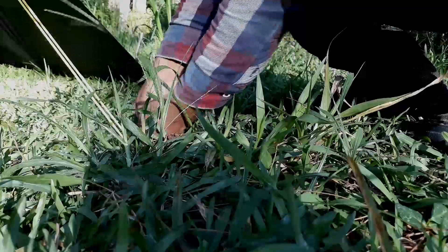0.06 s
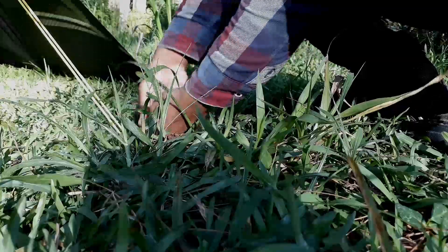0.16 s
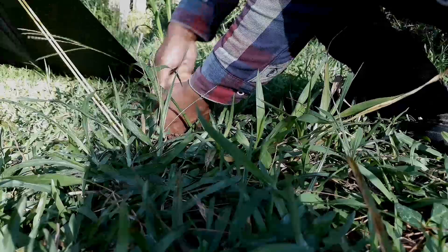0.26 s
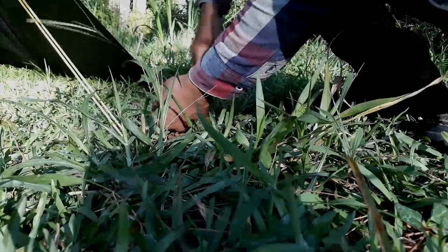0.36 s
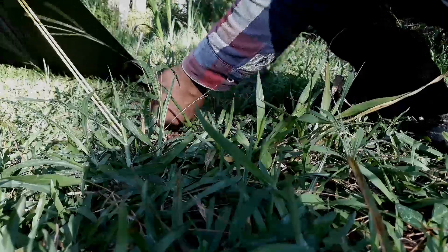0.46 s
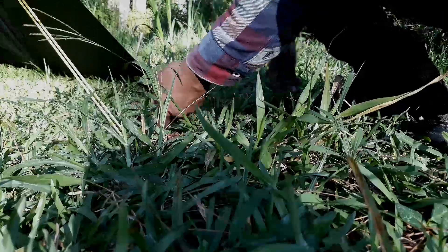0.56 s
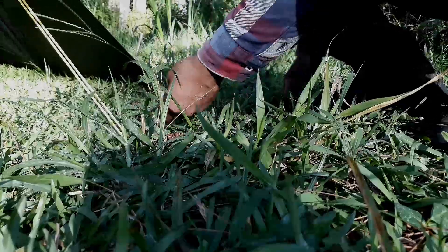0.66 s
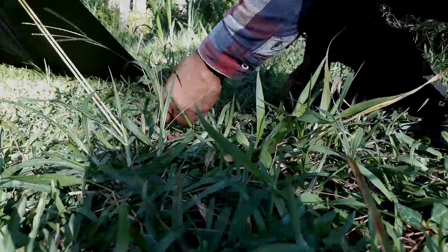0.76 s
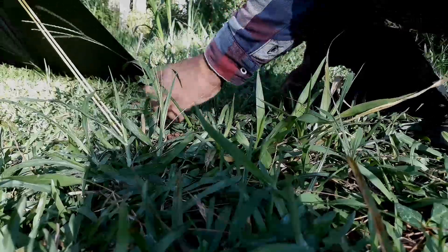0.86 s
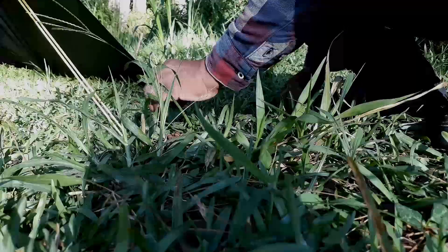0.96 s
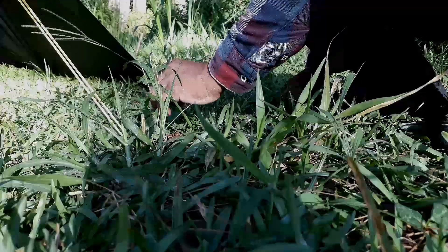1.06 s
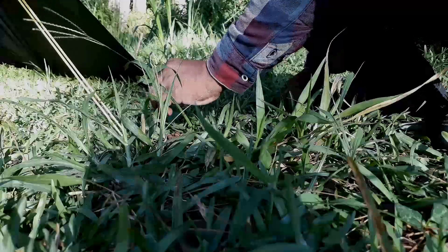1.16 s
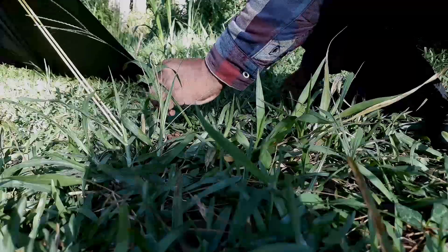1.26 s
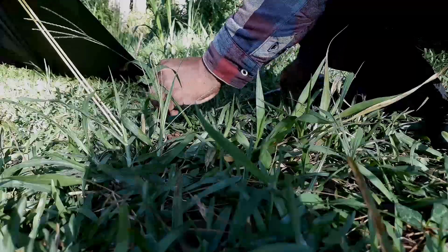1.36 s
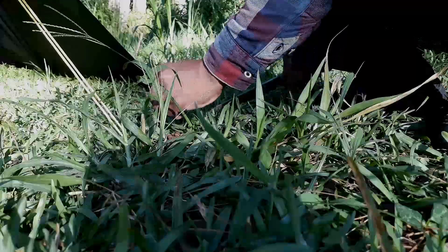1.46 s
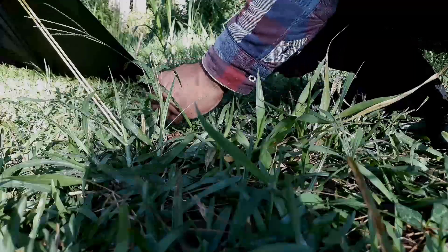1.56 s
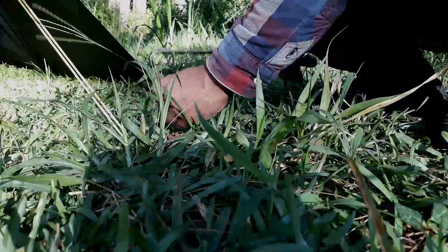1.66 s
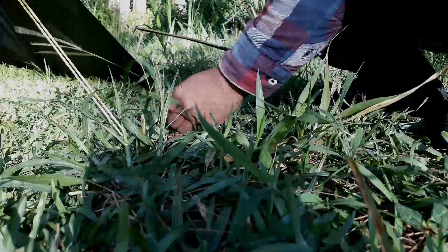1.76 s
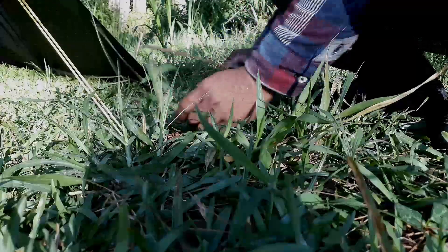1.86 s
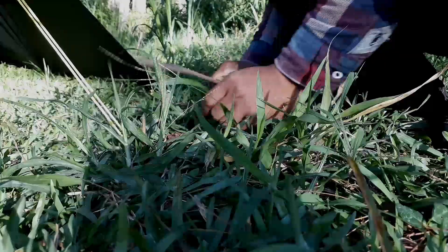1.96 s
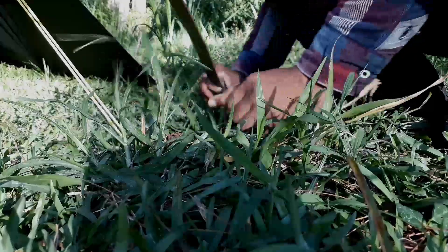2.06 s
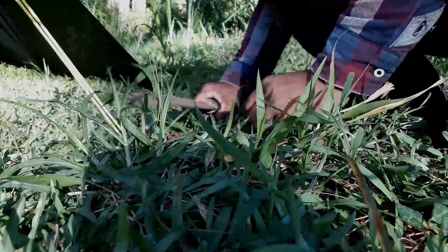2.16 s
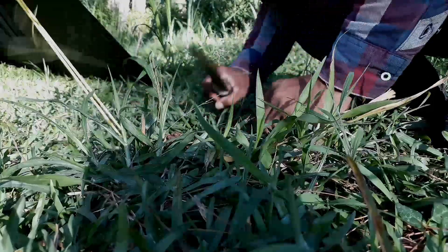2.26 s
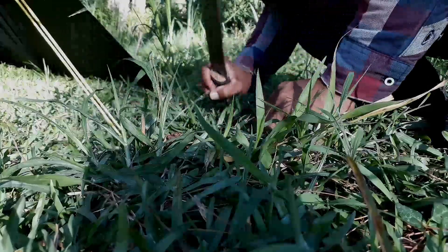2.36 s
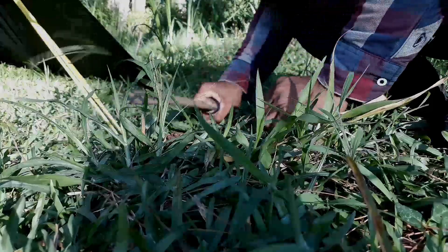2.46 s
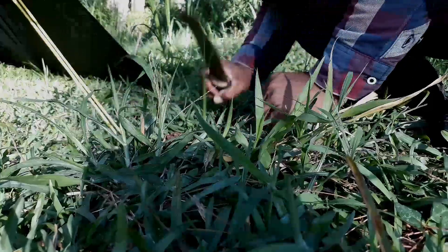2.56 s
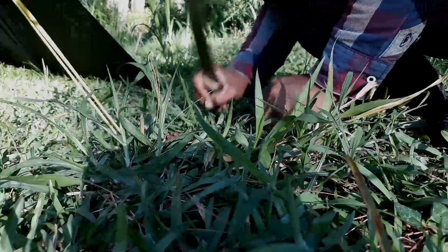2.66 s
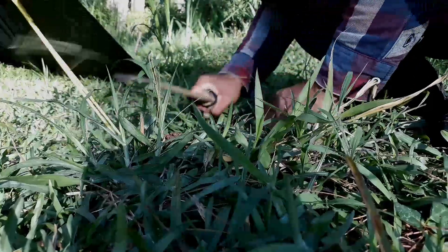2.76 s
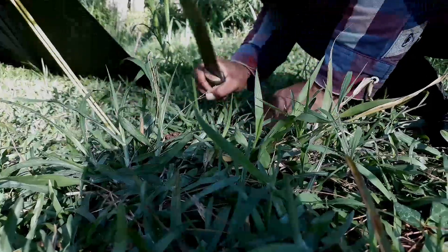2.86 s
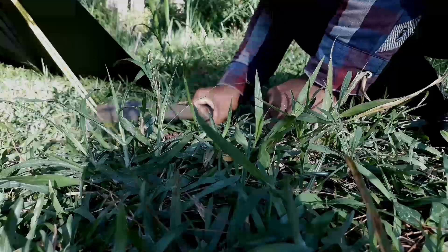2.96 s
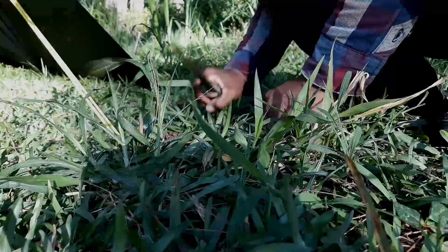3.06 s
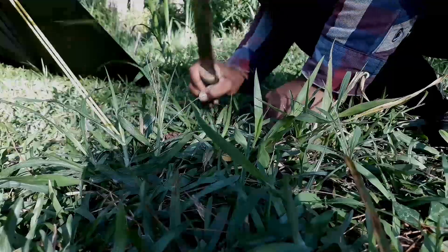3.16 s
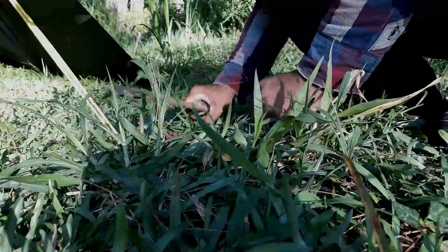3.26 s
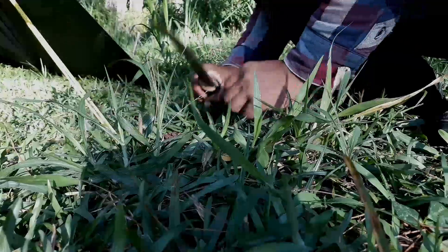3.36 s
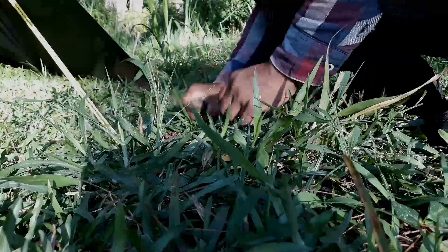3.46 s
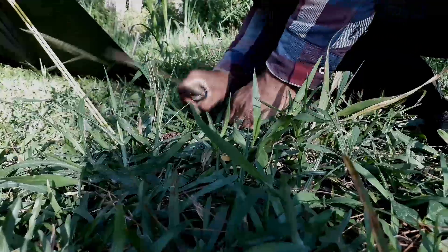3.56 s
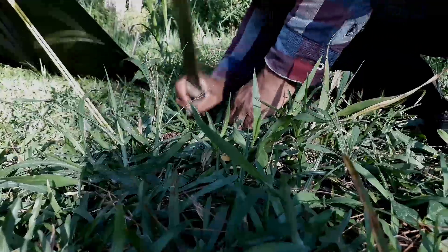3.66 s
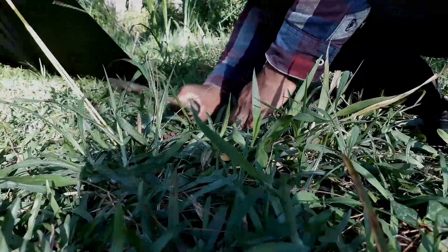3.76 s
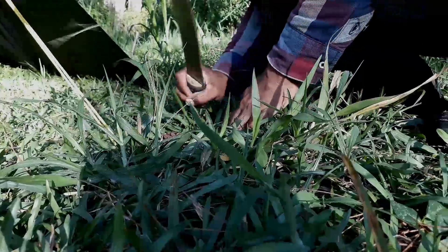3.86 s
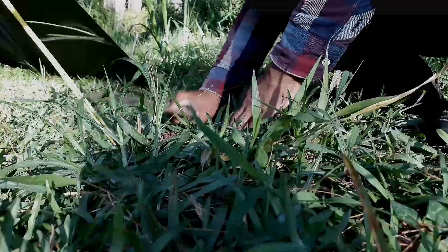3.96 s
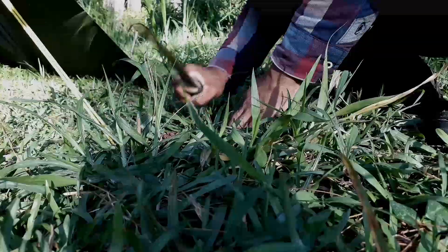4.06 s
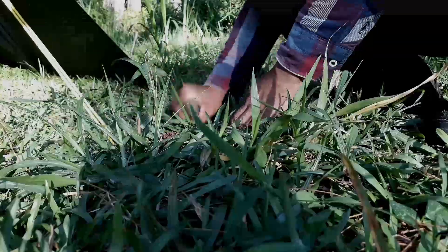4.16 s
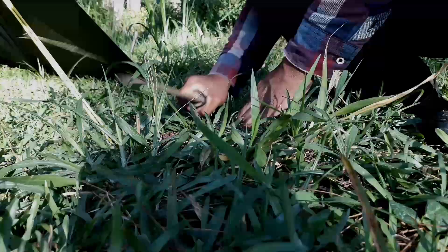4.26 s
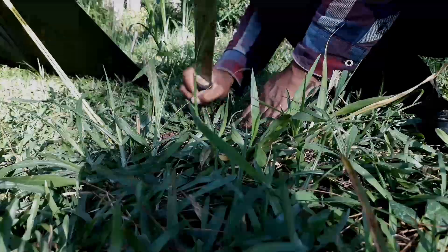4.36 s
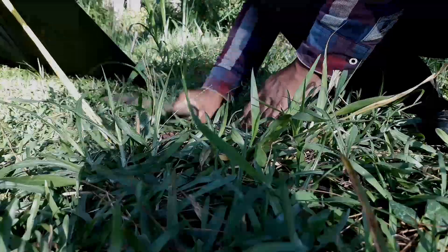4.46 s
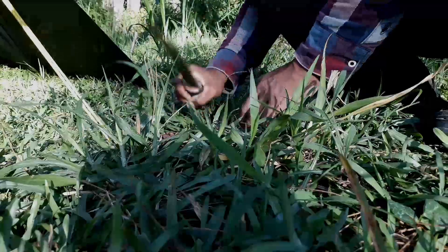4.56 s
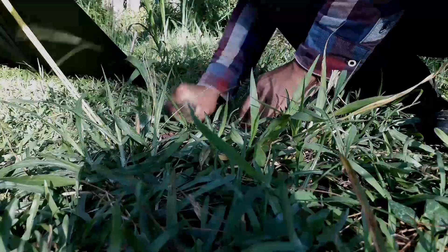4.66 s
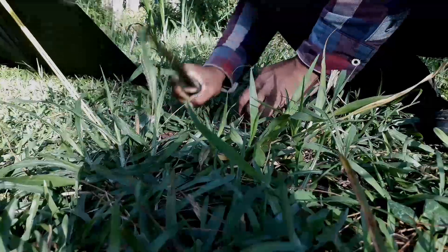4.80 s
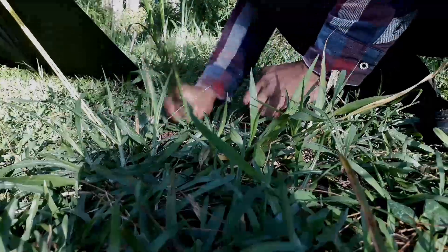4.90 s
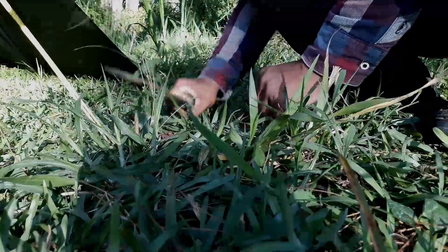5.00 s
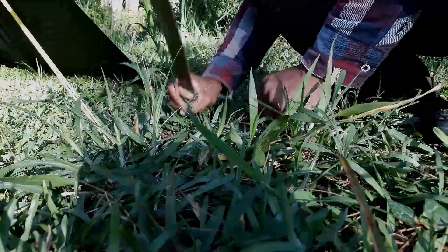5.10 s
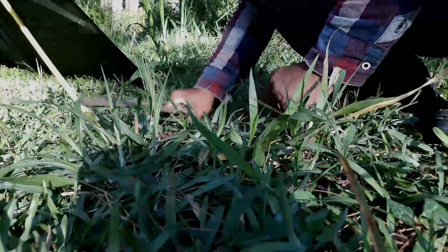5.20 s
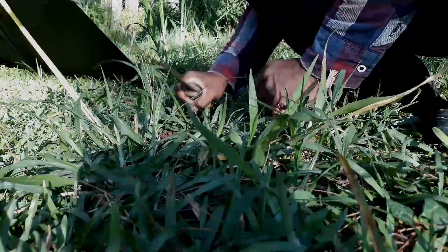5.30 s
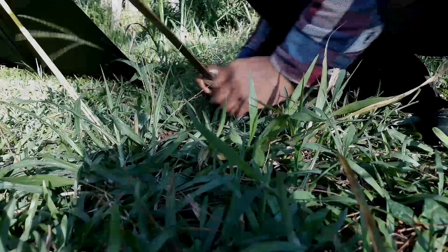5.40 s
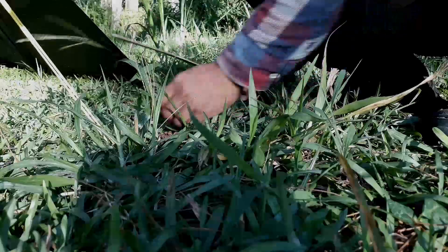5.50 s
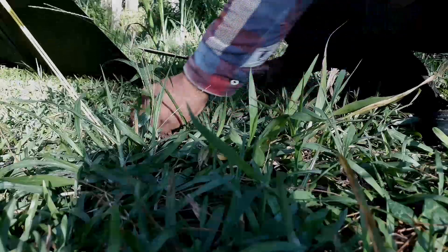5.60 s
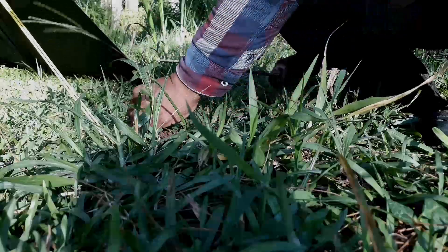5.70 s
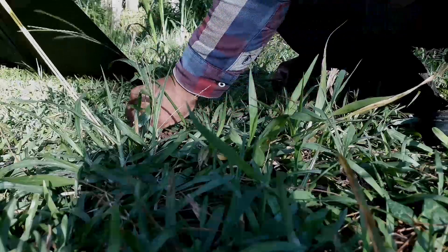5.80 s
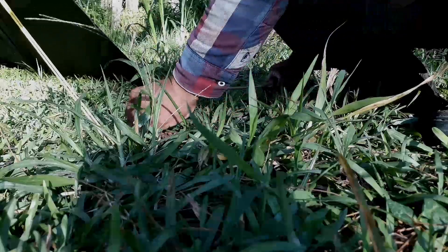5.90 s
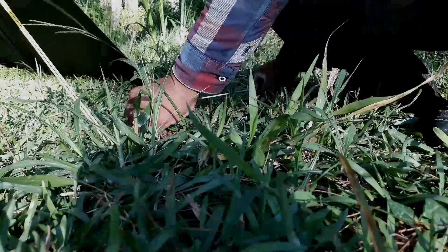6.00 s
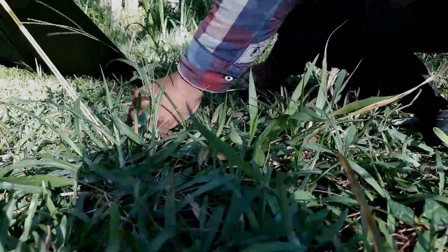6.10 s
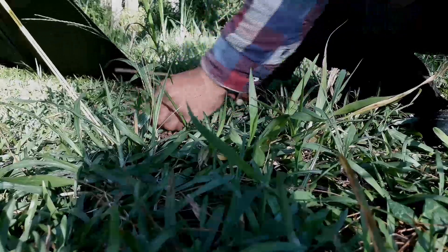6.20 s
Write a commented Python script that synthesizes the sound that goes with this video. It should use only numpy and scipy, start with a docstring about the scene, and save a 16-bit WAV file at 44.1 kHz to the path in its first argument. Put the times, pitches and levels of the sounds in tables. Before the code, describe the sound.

A sleeve rustles through grass, with a faint raspy zip and one light tap on wood. Then a steel tool drives a wooden stake into soil with thirteen quick knocks, the first ones glancing and scraping, the later ones louder and more solid, each with a low thud. The knocks are close and dry, in a quiet forest with light wind, a far drone and faint bird chirps.

```python
"""Driving a tent stake

A steel tool knocks a wooden stake into grassy soil: one light tap, then thirteen quick blows.
Early blows glance and scrape, later ones land squarely; each sends a low shudder through the ground.
A sleeve rustles in the grass, with light ticks, a raspy zip like a pulled cord and faint bird chirps.
Light wind, hissing leaves and a far drone fill the forest behind."""
import sys
import numpy as np
from scipy import signal
from scipy.fft import rfft, irfft, next_fast_len
from scipy.io import wavfile
from scipy.ndimage import uniform_filter1d, map_coordinates

SR = 44100
rng = np.random.default_rng(int(sys.argv[2]) if len(sys.argv) > 2 else 0)


def generate_wav(signal):
    """Clip the signal to [-1, 1] and save it as 16-bit WAV at the path in sys.argv[1]."""
    frames = np.transpose(np.atleast_2d(signal))
    scaled = np.clip(frames, -1, 1) * 32767
    pcm = np.round(scaled).astype(np.int16)
    wavfile.write(sys.argv[1], SR, pcm)


N = 275184


def amp(db):
    """Decibels to gain."""
    return 10 ** (np.asarray(db) / 20)


def unit(x):
    """Scale to rms 1."""
    return x / np.sqrt(np.mean(x ** 2) + 1e-20)


def along(points, hz):
    """Interpolate (f/Hz, value) points on a log frequency axis."""
    f, values = np.transpose(points)
    return np.interp(np.log(hz + 1), np.log(f + 1), values)


def wobble(rate_hz):
    """Smooth random curve, rate_hz knots a second."""
    knots = rng.standard_normal(int(N * rate_hz / SR) + 4)
    return map_coordinates(knots, [np.arange(N) * rate_hz / SR])


def rise_and_fall(t, rise_s, fall_s):
    """Exponential rise and fall, peak at t = 0."""
    return np.exp(-np.abs(t) / np.where(t < 0, rise_s, fall_s))


def add(track, start_s, sound):
    """Mix a sound into the track."""
    i = max(round(start_s * SR), 0)
    n = min(sound.shape[-1], N - i)
    track[..., i:i + n] += sound[..., :n]


def filtered(x, response):
    """Apply a complex frequency response."""
    n = x.shape[-1]
    padded = next_fast_len(n + SR // 4)
    return irfft(rfft(x, padded) * response(np.fft.rfftfreq(padded, 1 / SR)), padded)[..., :n]


def noise(spectrum, size):
    """Coloured noise, rms 1."""
    return unit(filtered(rng.standard_normal(size), lambda hz: amp(along(spectrum, hz))))


# Stereo width of near sounds: f/Hz, side gain
NEAR_WIDTH = [(500, 0.084), (3500, 0.019), (5000, 0.073), (7000, 0.11), (15000, 0.096)]
def near_noise(spectrum, size):
    """Coloured noise, almost alike in both channels."""
    mid, side = noise(spectrum, (2, size))
    side = filtered(side, lambda hz: along(NEAR_WIDTH, hz))
    return np.array([mid + side, mid - side])


def echoes(x, t60_table, spread):
    """Diffuse stereo tail; each frequency decays at its own rate."""
    hz, t, bins = signal.stft(rng.standard_normal((2, SR // 2)), SR, nperseg=128)
    mid, side = signal.istft(bins * amp(-60 * t / along(t60_table, hz)[:, None]), SR)[1]
    side = spread * filtered(side, lambda f: along(NEAR_WIDTH, f))
    tail = np.array([mid + side, mid - side])
    return signal.fftconvolve(x[None], tail / np.linalg.norm(mid), axes=1)[:, :len(x)]


# Ambient field: f/Hz, left-right correlation
AMBIENT_CORRELATION = [(60, -0.28), (150, -0.13), (380, -0.21), (950, -0.41), (2380, 0.39), (5980, 0.99),
                       (15000, 0.66)]
def wide_noise(spectrum):
    """Coloured stereo noise, rms 1, wide in the bass and narrow in the treble."""
    angle = lambda hz: np.arccos(np.clip(along(AMBIENT_CORRELATION, hz), -1, 1)) / 2
    weights = lambda hz: np.array([np.cos(angle(hz)), np.sin(angle(hz))])
    mid, side = filtered(noise(spectrum, (2, N)), weights)
    return unit(np.array([mid + side, mid - side]))


# Wind, rumble, drone and leaf spectra: f/Hz, relative density/dB
WIND_SPECTRUM = [(15, 7.5), (35, -3), (70, -8.5), (130, -9), (300, -41.5)]
RUMBLE_SPECTRUM = [(50, -42), (120, -9.5), (190, 4.5), (330, -4), (600, -8.5), (1500, -36)]
DRONE_SPECTRUM = [(80, -14.5), (200, -25), (300, -5.5), (450, -3.5), (600, -1.5), (760, 4.5), (900, 0),
                  (1100, -9.5), (1500, -19), (2500, -30.5), (5000, -42)]
LEAF_SPECTRUM = [(700, -10), (1500, 20), (3000, 15), (5000, 10.5), (6600, 16), (8000, -44), (12000, 13),
                 (15500, -11)]
# Drone swelling and receding: t/s, relative level/dB
DRONE_CONTOUR = [(0.0, -51.5), (1.39, -54), (3.65, -50.5), (4.61, -55.5), (5.07, -54.5), (5.86, -61.5),
                 (6.24, -61)]
def forest(wind_db=-44.5, rumble_db=-55, drone_gain_db=7, leaves_db=-72):
    """Light wind on the microphone, a far drone over a low rumble, a fine hiss of leaves."""
    contour_db = np.interp(np.arange(N) / SR, *np.transpose(DRONE_CONTOUR))
    wind = amp(wind_db + wobble(1.68)) * wide_noise(WIND_SPECTRUM)
    rumble = amp(rumble_db) * wide_noise(RUMBLE_SPECTRUM)
    drone = amp(contour_db + drone_gain_db + 0.16 * wobble(11)) * wide_noise(DRONE_SPECTRUM)
    leaves = amp(leaves_db + 0.3 * wobble(26)) * wide_noise(LEAF_SPECTRUM)
    return wind + rumble + drone + leaves


def stroke(start_s, length_s, attack_share=0.7, release_s=0.044):
    """Pressure of one sleeve sweep: build, hold, release."""
    end_s = start_s + length_s
    corners_s = [start_s, start_s + attack_share * length_s, end_s, end_s + release_s]
    return np.interp(np.arange(N) / SR, corners_s, [0, 1, 1, 0])


# Sweeps through the grass: t/s, length/s, level/dB
SLEEVE_STROKES = [(0.01, .29, -63), (.31, .08, -59.5), (0.588, 0.19, -47.5), (0.796, 0.11, -60.5),
                  (0.931, .016, -56), (1.87, 0.067, -61), (1.974, 0.057, -60), (2.043, 0.17, -58.5)]
# Blade and sleeve spectra: f/Hz, relative density/dB
GRASS_SPECTRUM = [(150, -3), (400, -16), (900, 1.5), (1800, -16), (3000, -9.5), (5600, -0.5), (8000, -7.5),
                  (12000, -6.5), (16000, -15)]
CLOTH_SPECTRUM = [(150, -26), (400, 5.5), (650, 1.5), (1400, -5.5), (2500, -8), (5000, -14.5)]
def rustle(grain_db=2.5, cloth_db=-45):
    """A sleeve drags over the blades in fine grains, fuller where it presses hardest."""
    pressure = sum(amp(db) * stroke(start_s, length_s) for start_s, length_s, db in SLEEVE_STROKES)
    blades = unit(near_noise(GRASS_SPECTRUM, N) * amp(grain_db * wobble(700)))
    cloth = unit(near_noise(CLOTH_SPECTRUM, N) * amp(grain_db * wobble(200)))
    return pressure * blades + amp(cloth_db) * (pressure / pressure.max()) ** 3 * cloth


# Zip, then bird chirps: t/s, length/s, start f/Hz, middle f/Hz, end f/Hz, level/dB
CHIRPS = [(0.315, 0.11, 2160, 3900, 6500, -56), (0.379, 0.061, 5500, 5110, 4580, -56.5),
          (2.555, .066, 5100, 4950, 4380, -59.5), (2.857, 0.037, 4830, 4400, 4480, -56.5),
          (5.397, 0.056, 2650, 2520, 1920, -60), (5.819, 0.015, 2800, 2540, 2410, -61),
          (6.001, 0.07, 1867, 2584, 2350, -53)]
def chirps(rasp_share=0.09, flutter_db=4, echo_db=-8):
    """A raspy rising zip, like a pulled cord, and faint bird chirps linger among the trees."""
    glides = np.zeros(N)
    waver = wobble(1500)
    for start_s, length_s, start_hz, middle_hz, end_hz, db in CHIRPS:
        progress = np.linspace(0, 1, int(length_s * SR))
        glide_hz = np.polyval(np.polyfit([0, .5, 1], [start_hz, middle_hz, end_hz], 2), progress)
        rasp_hz = rasp_share * abs(end_hz - start_hz) * waver[int(start_s * SR):][:len(progress)]
        phase = 2 * np.pi * np.cumsum(glide_hz + rasp_hz) / SR
        add(glides, start_s, amp(db) * np.sin(np.pi * progress) * np.sin(phase))
    glides *= amp(flutter_db * wobble(140))
    return glides + amp(echo_db) * echoes(glides, [(2500, 1.1), (5000, .5)], spread=0.86)


# Grass and tool ticks: t/s, relative level/dB
LIGHT_TICKS = [(0.7229, -40), (0.776, -42), (1.7429, -44.5), (2.035, -45), (2.1962, -30), (2.589, -30),
               (3.1188, -46), (3.406, -44), (3.891, -44.5), (4.355, -42.5), (4.647, -43.5), (4.847, -39),
               (5.4135, -42)]
def ticks(t60_s=0.0091, gain_db=-2):
    """Short light ticks in the grass and from the tool lifting after blows."""
    out = np.zeros((2, N))
    t = np.arange(SR // 20) / SR
    for start_s, db in LIGHT_TICKS:
        add(out, start_s, amp(db + gain_db - 60 * t / t60_s) * near_noise(GRASS_SPECTRUM, len(t)))
    return out


# Modes of the stake held in soil: f/Hz, bandwidth/Hz, relative level/dB
STAKE_MODES = [(331.5, 100, 4.5), (717, 500, 4.5), (1250, 380, 2), (1763, 146, 1), (2230, 110, -9),
               (3367, 330, 2.5), (4040, 140, -5), (5070, 250, -3), (6500, 720, -21)]
def knock(t, hard_hz, return_s=0.00236, return_share=0.18, vary_db=0.5, bend_hz=300, radiate_hz=330):
    """One push rings the damped stake; the wave returns inverted from its buried tip."""
    gains = amp(rng.normal(0, vary_db, len(STAKE_MODES)))
    wood = lambda f: sum(gain * amp(db) * 1j * f * width / (hz * hz - f * f + 1j * f * width)
                         for gain, (hz, width, db) in zip(gains, STAKE_MODES))
    contact = lambda f: 1 / (1 + 1.4j * f / hard_hz - (f / hard_hz) ** 2)  # softer is duller
    bending = lambda f: (1j * f - bend_hz) / (1j * f + bend_hz)  # low bending waves run slower
    radiation = lambda f: 1j * f / (1j * f + radiate_hz)
    tip = lambda f: 1 - return_share * np.exp(-2j * np.pi * f * return_s)
    push = 1. * (np.arange(len(t)) == np.searchsorted(t, -.0005))
    wave = filtered(push, lambda f: wood(f) * contact(f) * bending(f) * radiation(f) * tip(f))
    return wave / np.abs(wave).max()


def tap(at_s=0.7235, peak_db=-29):
    """One light, hard touch on the stake."""
    out = np.zeros(N)
    t = np.arange(-SR // 100, SR // 20) / SR
    add(out, at_s + t[0], amp(peak_db) * knock(t, hard_hz=4200))
    return out


# Tool through grass: f/Hz, relative density/dB
SWING_SPECTRUM = [(300, -2), (1200, 2), (2500, -1), (4000, -3), (7000, -3), (11000, -14), (16000, -18)]
def swing(t):
    """The tool brushes the grass on its way down and comes to rest."""
    return near_noise(SWING_SPECTRUM, len(t)) * rise_and_fall(t, rise_s=0.015, fall_s=0.012)


# Steel sliding on wood: f/Hz, relative density/dB
SKID_SPECTRUM = [(600, -4), (1800, -7.5), (3200, -16.5), (5500, -0.5), (7500, -2), (11000, -1),
                 (15500, -2.5)]
def skid(t, over_knock_db, max_lead_s=0.0029, full_skid_db=-14, slip_db=4.5):
    """Steel sticks and slips on the stake's head before the knock; a square blow bites at once."""
    lead_s = max_lead_s * min(1, amp(over_knock_db - full_skid_db))
    envelope = rise_and_fall(t + lead_s, rise_s=0.00095, fall_s=0.002)
    roughness = unit(uniform_filter1d(rng.standard_normal(len(t)), size=12))
    slips = unit(amp(slip_db * roughness))
    return near_noise(SKID_SPECTRUM, len(t)) * envelope * slips


# Packing soil: f/Hz, relative density/dB
CRUNCH_SPECTRUM = [(400, -27), (1200, -9), (2200, 3.5), (3500, -7), (7000, -1.5), (11000, -65), (16000, -6)]
def crunch(t, decay_s=0.0031):
    """Soil packs round the sinking stake."""
    return near_noise(CRUNCH_SPECTRUM, len(t)) * (t > 0) * np.exp(-np.maximum(t, 0) / decay_s)


def thump(t, turf_hz=172, t60_s=0.044):
    """The stake bounces on the springy turf."""
    age_s = np.maximum(t, 0)
    return np.sin(2 * np.pi * turf_hz * rng.normal(1, 0.027) * age_s) * amp(-60 * age_s / t60_s)


# Ground wave: f/Hz, relative density/dB
GROUND_SPECTRUM = [(25, -22), (58, 1), (85, -10.5), (130, -9), (200, -5.5), (280, -18.5), (700, -39)]
def shudder(t, max_delay_s=0.03976, dispersion_hz=110, decay_s=0.031):
    """The ground wave comes by many paths; short ripples arrive first, long ones later."""
    paths = rng.standard_normal(len(t)) * (t > 0) * np.exp(-np.abs(t) / decay_s)
    lag_cycles = lambda f: max_delay_s * dispersion_hz * (1 - np.exp(-f / dispersion_hz))
    soil = lambda f: amp(along(GROUND_SPECTRUM, f)) * np.exp(-2j * np.pi * lag_cycles(f))
    return unit(filtered(paths, soil))


# Decay off grass and tent wall: f/Hz, t60/s
SCATTER_T60 = [(100, .07), (400, .045), (1500, .035), (6000, .05), (14000, .033)]
def scatter(x, spread, gain_db=-19):
    """Nearby grass and the tent wall return a short diffuse tail."""
    return amp(gain_db) * echoes(x, SCATTER_T60, spread)


# Blows: t/s, knock level/dB, contact cutoff/Hz, skid level/dB
STAKE_BLOWS = [(2.2077, -18, 630, -14.5), (2.5152, -12.5, 2030, -19.5), (2.7954, -15, 1250, -20.5),
               (3.0469, -13.5, 1490, -21), (3.313, -11.5, 1520, -23), (3.5643, -12, 1660, -31),
               (3.7949, -12.5, 1570, -25), (4.0298, -10, 1590, -31), (4.2684, -7, 2160, -47),
               (4.5249, -3, 2800, -33), (4.7687, -5.5, 1800, -35.5), (5.0057, -5.5, 1900, -33.5),
               (5.2335, -8, 1260, -37)]
def hammering(crunch_gain_db=-24, swing_gain_db=-44, thump_db=-31, shudder_db=-49):
    """Steel skids, bites and drives the stake; the soil yields at much the same force each time."""
    out = np.zeros((2, N))
    t = np.arange(-SR // 10, SR // 4) / SR
    for at_s, knock_db, hard_hz, skid_db in STAKE_BLOWS:
        scrape = amp(skid_db) * skid(t, skid_db - knock_db)
        packing = amp(knock_db + crunch_gain_db) * crunch(t)
        swish = amp(.5 * knock_db + swing_gain_db) * swing(t)
        blow = amp(knock_db) * knock(t, hard_hz) + scrape + packing
        ground = amp(thump_db) * thump(t) + amp(shudder_db) * shudder(t)
        add(out, at_s + t[0], blow + swish + ground + scatter(blow.mean(axis=0), spread=0.83))
    return out


# Modes of the steel tool: f/Hz, relative level/dB, t60/s
TOOL_MODES = [(6300, -7, .04), (12215, 3, 0.052), (13160, -3, .058)]
def tool_ring(t):
    """Bright steel modes decay, their strengths varying by blow and channel."""
    age_s = np.maximum(t, 0)
    return sum(amp(db + rng.normal(0, 1, (2, 1)) - 60 * age_s / t60_s) * np.sin(2 * np.pi * hz * age_s)
               for hz, db, t60_s in TOOL_MODES)


# Steel catching on the stake: t/s, squeak level/dB, ring gain/dB
GLANCING_BLOWS = [(2.2053, -30, -35), (2.5152, -10, -28), (3.0459, -12, -36), (3.3103, -42, -39)]
def glances(squeak_hz=6330, width_s=0.00045):
    """A few cycles of stick and slip, scattered by the grass, leave the tool ringing."""
    squeaks, rings = np.zeros(N), np.zeros((2, N))
    t = np.arange(-SR // 100, SR // 8) / SR
    squeak = np.sin(2 * np.pi * squeak_hz * t) * np.exp(-.5 * (t / width_s) ** 2)
    for at_s, squeak_db, ring_db in GLANCING_BLOWS:
        add(squeaks, at_s + t[0], amp(squeak_db) * squeak)
        add(rings, at_s + t[0], amp(ring_db) * tool_ring(t))
    return squeaks + rings + scatter(squeaks, spread=0.9)


def scene():
    """The blows, their faint echo from the trees, and the campsite around them."""
    blows = hammering() + glances() + tap()
    trees = amp(-33) * echoes(blows.mean(axis=0), [(200, 0.16), (6000, 0.59), (14000, 0.65)], spread=0.46)
    return blows + trees + rustle() + ticks() + chirps() + forest()


# Microphone response: f/Hz, gain/dB
MIC_RESPONSE = [(7500, -1), (9600, -10.5), (11500, -5)]
def record(dry):
    """The microphone dips the treble; a steep low-pass cuts the top."""
    cutoff_hz = 16200
    return filtered(dry, lambda hz: amp(along(MIC_RESPONSE, hz)) / (1 + (hz / cutoff_hz) ** 120))


dry = scene()
out = record(dry)
generate_wav(out)
```